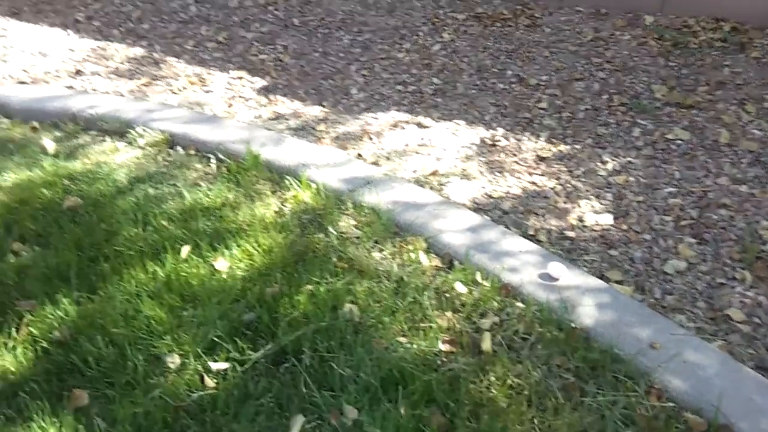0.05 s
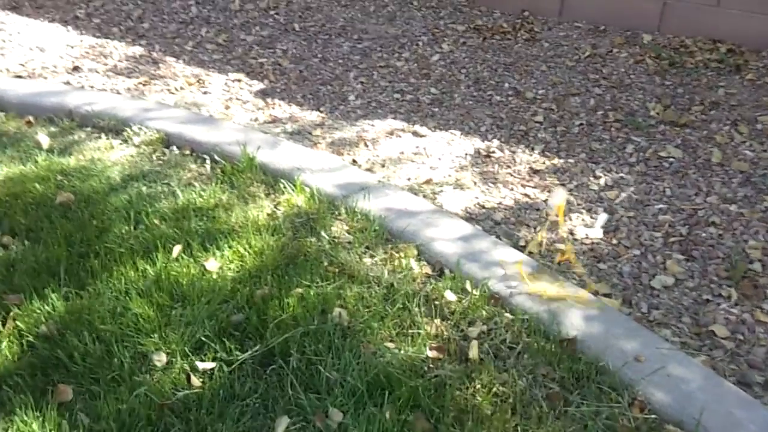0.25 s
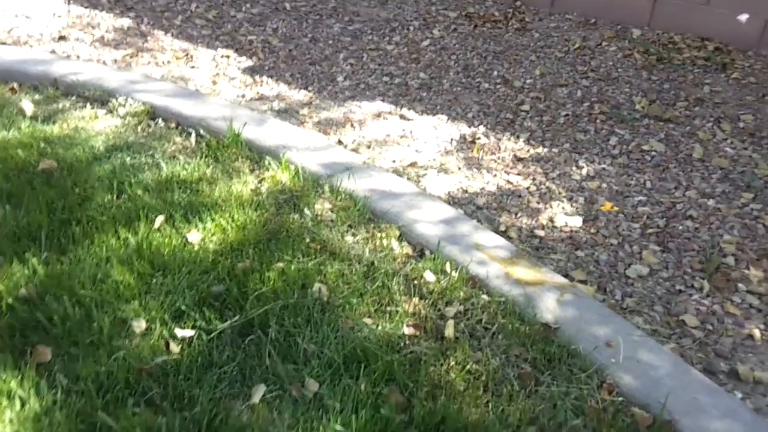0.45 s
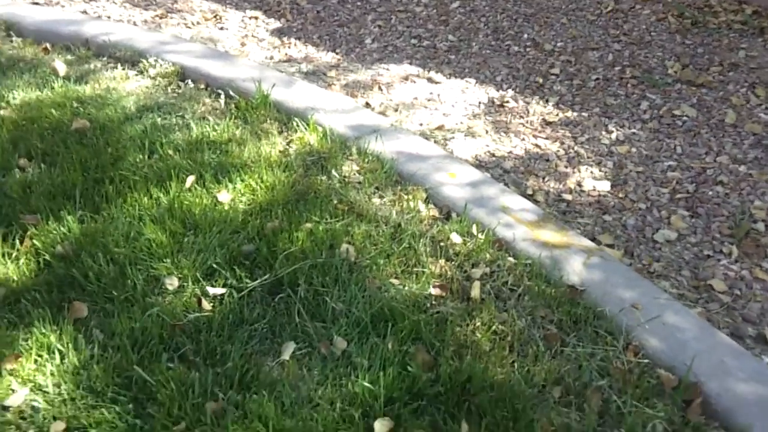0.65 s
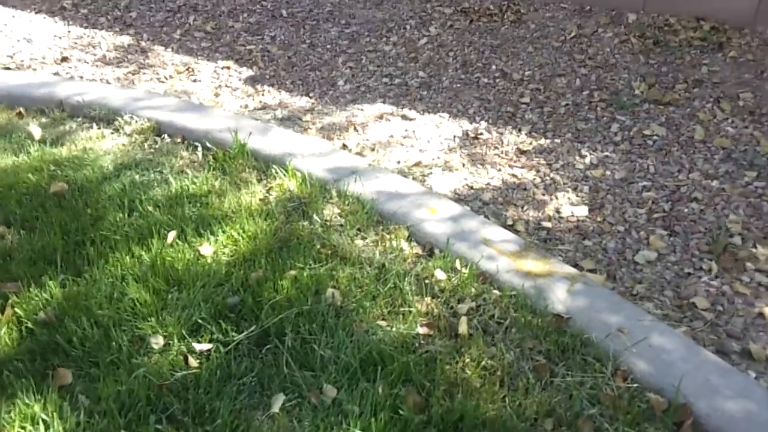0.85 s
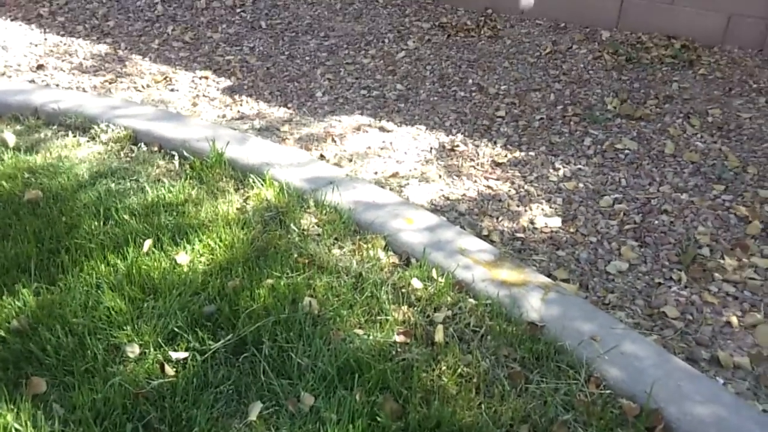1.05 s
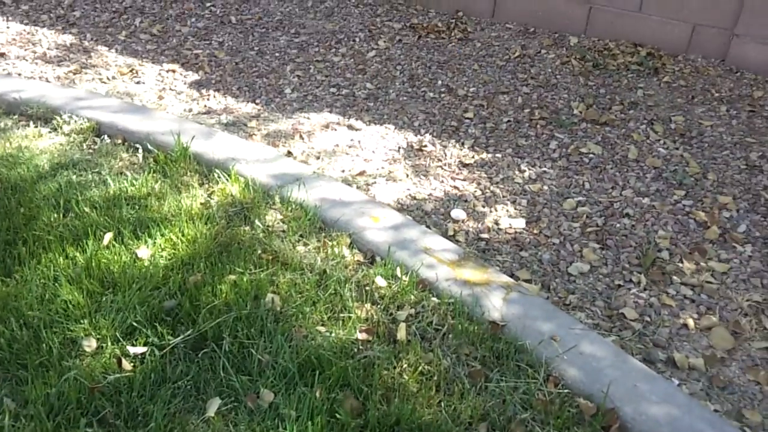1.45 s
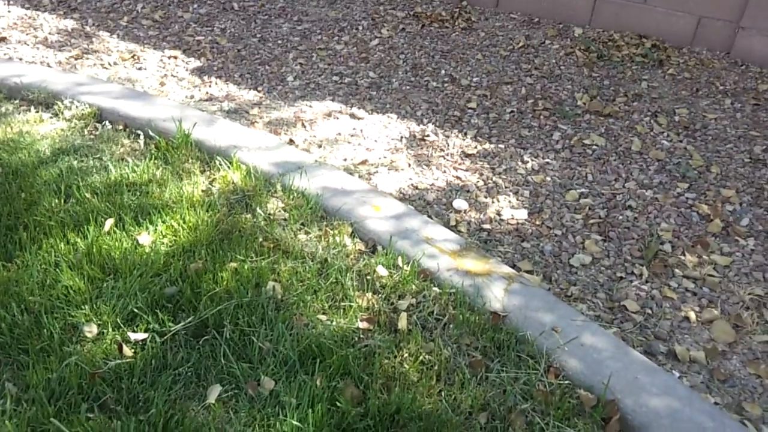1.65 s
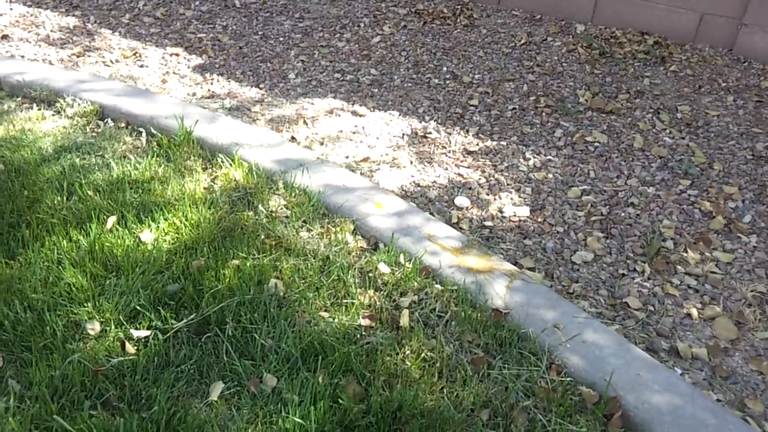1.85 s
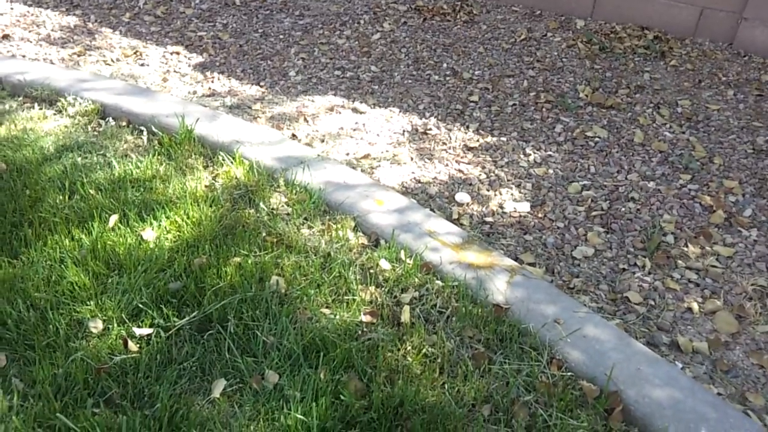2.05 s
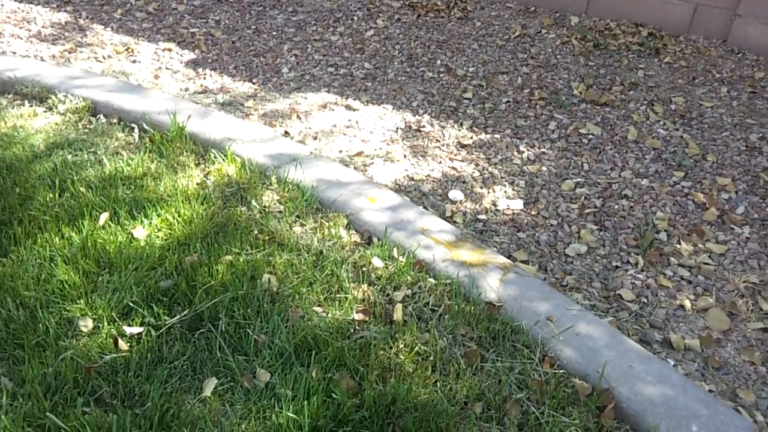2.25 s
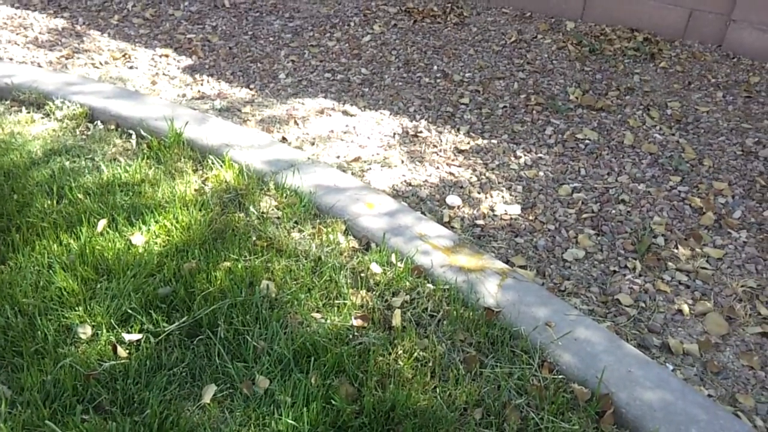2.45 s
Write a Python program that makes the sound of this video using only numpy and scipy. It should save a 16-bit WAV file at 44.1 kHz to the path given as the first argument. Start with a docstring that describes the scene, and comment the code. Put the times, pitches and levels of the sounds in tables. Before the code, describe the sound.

An egg smacks onto a concrete curb with one sharp, wet splat outdoors.

```python
"""A crack and a flat, wet slap: an egg thrown onto a concrete curb, close to the microphone in a quiet yard.
The shell gives way, the body lands with a push of air, and the spray overloads the input. Drops and
shell bits patter into gravel and dry leaves while the walls answer. Later come light ticks, a faint
far drone and soft scuffs, over hiss and a low rumble of air."""
import sys
import numpy as np
from scipy import signal
from scipy.fft import rfft, irfft, next_fast_len
from scipy.io import wavfile
from scipy.ndimage import map_coordinates

SR = 44100
rng = np.random.default_rng(int(sys.argv[2]) if len(sys.argv) > 2 else 0)


def master(y):
    """Save y as 16-bit WAV."""
    cut = np.clip(np.atleast_2d(y).T, -1, 1)
    pcm = np.round(cut * 32767)  # scale
    wavfile.write(sys.argv[1], SR, pcm.astype(np.int16))


N = 110250
T = np.arange(N) / SR
HIT_S = .2398  # the egg's body meets the curb

# At the curb, close up. Modes of the slap: f/Hz, level/dB, t60/s
SLAP_MODES = [(376, -5.5, 0.075), (548, 1, 0.03), (643, -8, 0.11), (1486, -9.5, 0.15)]
# spectra of the cracking shell, the wet smack and the spray: f/Hz, level/dB
SHELL_SPECTRUM = [(200, -13), (1500, -9), (4500, -7), (7200, 7), (9000, -9), (12000, -12)]
SMACK_SPECTRUM = [(60, -9), (120, 1), (190, -20.5), (380, 2.5), (850, -8), (1500, -0.5), (3200, -3),
                  (5500, -1), (8000, -7), (12000, -1.5)]
SPRAY_SPECTRUM = [(100, -35), (500, -4), (900, -1), (1500, -2.5), (1950, -9.5), (2450, 1.5), (3400, -2),
                  (5300, 2), (6800, 3.5), (9300, 4), (12000, -6)]
# large drops and shell bits landing near the curb: t/s, level/dB, f/Hz
LARGE_DROPS = [(0.2458, 2, 3280), (0.2481, -1, 2870), (0.2594, -3.5, 1560), (0.2684, 2.5, 1570),
               (0.2722, -2, 1440), (0.2923, -24, 1600), (0.3017, -6.5, 1890), (0.3029, -10, 4170),
               (0.3412, -14, 4060), (0.3598, -15, 2940), (0.3644, -16, 6000), (0.3699, -14, 2680),
               (0.3798, -12.5, 7600), (0.3937, -17.5, 3750), (0.4213, -21, 1750), (0.4798, -32, 2900)]
# spectra of fine drops on the gravel, near and farther out: f/Hz, level/dB
NEAR_PATTER_SPECTRUM = [(200, -5), (1200, -5), (4000, -1), (8000, -5), (12000, -32)]
FAR_PATTER_SPECTRUM = [(500, -11), (2000, 4.5), (4500, -1), (12000, -24)]
# decay between the yard walls: f/Hz, t60/s
WALL_DECAY = [(100, 0.65), (500, 0.5), (2200, 0.79), (7000, 0.48), (12000, 0.18)]
# colour of the walls' answer: f/Hz, level/dB
WALL_COLOUR = [(125, 2), (550, -16), (1100, -2.5), (1700, -6), (4000, -6.5), (8000, -10.5), (12000, 8.5)]
# light ticks in gravel and leaves: t/s, level/dB, f/Hz, Q
GRAVEL_TICKS = [(0.139, -44.5, 6200, 4), (0.1412, -43.5, 342, 2.7), (0.5638, -40.5, 8150, 0.85),
                (0.7484, -40.5, 7350, 1.9), (0.796, -43, 5180, 1.8), (.829, -44, 1670, 0.74),
                (0.836, -33, 7140, 0.92), (1.063, -41, 5900, 3.1), (1.081, -40.5, 5500, 1.1),
                (1.2121, -33, 3480, 0.083), (1.214, -33.5, 7860, 0.47), (1.428, -44.5, 2500, 0.21),
                (2.2402, -36.5, 6030, 3), (2.3703, -39, 1160, 0.55), (2.379, -35.5, 6850, 2.1),
                (2.3898, -38.5, 1810, 2.6)]
# soft scuffs on the ground: t/s, level/dB, half length/s, tilt/(dB per octave)
GROUND_SCUFFS = [(0.195, -50, 0.019, 0), (0.728, -51, 0.064, 2.5), (1.16, -50, 0.015, 5),
                 (2.267, -45, 0.045, 4), (2.384, -43, 0.029, 2), (2.433, -49, 0.12, 5)]
# spectra of a scuff and of dry leaves: f/Hz, level/dB
SCUFF_SPECTRUM = [(150, -3), (800, 9), (2200, 8), (3500, 0), (6600, -1), (7450, 3.5), (8200, -6),
                  (12000, -10.5)]
LEAF_SPECTRUM = [(200, -30), (3000, -13), (6000, -5), (12000, -4.5)]
# how strongly the leaves stir: t/s, level/dB
LEAF_STIR = [(0, -19), (.7, 3), (1.16, -1), (1.33, -20), (1.58, -1), (1.82, -14)]
# fuzzy tones of the far drone: f/Hz, width/Hz, level/dB
DRONE_TONES = [(629, 25, -60), (866, 73, -57.5), (1160, 54, -57)]
# spectra of the open air: f/Hz, level/dB
HISS_SPECTRUM = [(88, -41), (150, -4), (380, -2), (750, -7), (1450, -8.5), (3000, -12.5), (5500, -12.5),
                 (8000, -16), (11500, -19)]
RUMBLE_SPECTRUM = [(15, -7), (30, 0), (65, 2), (100, -5), (160, -11.5), (400, -43.5)]
# soft bumps at the microphone: t/s, level/dB
MIC_BUMPS = [(0.696, -30.5), (2.168, -41)]


def amp(db):
    """Decibels to gain."""
    return 10 ** (np.asarray(db) / 20)


def unit(x):
    """Scale to rms 1."""
    return x / np.sqrt(np.mean(x ** 2) + 1e-20)


def along(points, hz):
    """Read (f/Hz, value) points on a log axis."""
    f, values = np.transpose(points)
    return np.interp(np.log(hz + 1), np.log(f + 1), values)


def filtered(x, response):
    """Shape x by a frequency response."""
    size = next_fast_len(N + SR // 2)
    return irfft(rfft(x, size) * response(np.fft.rfftfreq(size, 1 / SR)), size)[:N]


def coloured(x, spectrum):
    """Shape x by (f/Hz, level/dB) points."""
    return filtered(x, lambda f: amp(along(spectrum, f)))


def low_pass(x, edge_hz):
    """A steep low-pass with a slightly rounded edge."""
    return filtered(x, lambda f: .5 - .5 * np.tanh((f - edge_hz) / 90))


def noise(spectrum):
    """Smooth coloured noise, rms 1."""
    return unit(coloured(rng.standard_normal(N), spectrum))


def band_noise(hz, q):
    """Noise passed twice through one resonance, rms 1."""
    def resonance(f):
        damping = 1j * f * hz / q
        return damping / (hz ** 2 - f * f + damping)
    return unit(filtered(rng.standard_normal(N), lambda f: resonance(f) ** 2))


def grains(spectrum, per_s):
    """Tiny impacts of random size at random moments, rms 1."""
    impacts = (rng.random(N) < per_s / SR) * rng.standard_normal(N)
    return unit(coloured(impacts, spectrum))


def envelope(start, rise, hold, t60):
    """Linear rise; from hold seconds after the start, an even fall in dB."""
    t = T - start
    return np.clip(t / rise, 0, 1) * amp(-60 * np.maximum(t - hold, 0) / t60)


def swell(centre, width):
    """A bell-shaped rise and fall."""
    return np.exp(-.5 * ((T - centre) / width) ** 2)


def sine(hz, start=0):
    """A sine rising through zero at start."""
    return np.sin(2 * np.pi * hz * (T - start))


def wobble(per_s):
    """A smooth random curve with per_s knots a second."""
    return map_coordinates(rng.standard_normal(4096), [T * per_s], mode="mirror")


def clumps():
    """A fast flutter of gain: fine drops and grit come in clumps."""
    return amp(3.5 * np.tanh(wobble(per_s=240.7)))


def splat():
    """Close to the microphone the shell cracks, the body slaps down and its contents squirt out."""
    crack = envelope(HIT_S - .0081, rise=.0013, hold=.0084, t60=.015) * grains(SHELL_SPECTRUM, per_s=9300)
    slap = sum(-amp(db) * envelope(HIT_S, rise=.00016, hold=0, t60=t60) * sine(hz, HIT_S)
               for hz, db, t60 in SLAP_MODES)
    smack = envelope(HIT_S, rise=.00047, hold=.007, t60=.077) * noise(SMACK_SPECTRUM)
    spray = envelope(HIT_S, rise=.015, hold=.035, t60=.1) * grains(SPRAY_SPECTRUM, per_s=6000)
    return amp(-21) * crack + slap + amp(4) * smack + amp(-2.5) * spray


def air_push():
    """Air squeezed from under the egg: one pressure pulse, then the microphone input's slow undershoot."""
    arrival_s, undershoot_s = HIT_S + .0072, .025
    age = np.maximum(T - arrival_s, 0) / undershoot_s
    return amp(2.5) * swell(arrival_s, width=.0026) - amp(-19) * age * np.exp(1 - age)


def spatter():
    """Fine drops rain on the gravel, the farthest landing last; each large one snaps and fizzes."""
    near = amp(-29) * envelope(HIT_S + .053, rise=.023, hold=.098, t60=.14)
    near *= grains(NEAR_PATTER_SPECTRUM, per_s=2200)
    far = amp(-42.5) * envelope(HIT_S + .16, rise=.086, hold=.086, t60=.75)
    far *= grains(FAR_PATTER_SPECTRUM, per_s=900)
    out = (near + far) * clumps()
    for start, db, hz in LARGE_DROPS:
        snap = envelope(start, rise=.00014, hold=0, t60=9 / hz) * sine(hz, start)
        fizz = envelope(start, rise=.000067, hold=.0011, t60=.01) * band_noise(hz, q=.56)
        out += amp(db) * (snap + amp(-8.5) * fizz)
    return out


def yard_walls(source):
    """The walls around the yard answer; the middle of the spectrum lingers longest."""
    build_up_s = .028
    hz, t, bins = signal.stft(rng.standard_normal(SR), SR, nperseg=256)
    decay = amp(-60 * t / along(WALL_DECAY, hz)[:, None])
    _, tail = signal.istft(bins * decay, SR, nperseg=256)
    tail *= np.clip(np.arange(len(tail)) / SR / build_up_s, 0, 1)
    reflections = signal.fftconvolve(source, tail / np.linalg.norm(tail))[:N]
    return amp(-15.5) * coloured(reflections, WALL_COLOUR)


def ticks():
    """Small bits touch stones and leaves, each with a tick and a brief rustle; one rings a pebble."""
    pebble = envelope(1.2135, rise=.00032, hold=.001, t60=.1) * band_noise(3650, q=17)
    out = amp(-42.5) * pebble
    for start, db, hz, q in GRAVEL_TICKS:
        tick = envelope(start, rise=.00073, hold=.0016, t60=.016)
        rustle = amp(-10.5) * envelope(start, rise=.013, hold=.016, t60=.096)
        out += amp(db) * (tick + rustle) * band_noise(hz, q)
    return out


def scuffs():
    """Soft gritty rubbing at ground level: dry leaves, and perhaps a shoe shifting on the grass."""
    rubs = np.zeros(N)
    for centre, db, width, tilt in GROUND_SCUFFS:
        spectrum = [(hz, level + tilt * np.log2(hz)) for hz, level in SCUFF_SPECTRUM]
        rubs += amp(db) * swell(centre, width) * grains(spectrum, per_s=9000)
    return rubs * clumps()


def leaves():
    """Dry leaves stir faintly in the air moving through the yard."""
    stir_db = np.interp(T, *np.transpose(LEAF_STIR))
    flutter_db = 7.5 * wobble(per_s=22.03)
    return amp(-60.5 + stir_db + flutter_db) * grains(LEAF_SPECTRUM, per_s=6100)


def drone():
    """Far off, a thin wavering note among a few fuzzy tones swells and fades."""
    tones = sum(amp(db) * band_noise(hz, q=hz / width / 2) for hz, width, db in DRONE_TONES)
    note_hz = 1090 + 3.5 * wobble(per_s=17)
    note = amp(-54.5) * np.sin(2 * np.pi * np.cumsum(note_hz) / SR)
    return envelope(1.79, rise=.044, hold=.057, t60=1.84) * (tones + note)


def background():
    """The quiet yard: hiss, rumbling air with one gust, a faint hum and low bumps at the microphone."""
    gust_db = 7.5 * swell(.68, width=.097)
    rumble = amp(-51.5 + gust_db) * noise(RUMBLE_SPECTRUM)
    hiss = amp(-51) * noise(HISS_SPECTRUM)
    hum = amp(-57.5) * sine(hz=122)
    bumps = sum(-amp(db) * swell(t, width=.0099) * sine(hz=55, start=t) for t, db in MIC_BUMPS)
    return hiss + rumble + hum + bumps


def scene():
    """Everything that reaches the one microphone by the curb."""
    egg = splat() + spatter()
    return (egg + air_push() + yard_walls(egg) + ticks() + scuffs() + leaves() + background() + drone())[None]


def record(dry):
    """The microphone input overloads and is band-limited; the output stage clips the remaining peaks."""
    input_limit, output_limit = .75, .77
    mic = low_pass(np.clip(dry[0], -input_limit, input_limit), edge_hz=11750)
    return low_pass(np.clip(mic, -output_limit, output_limit), edge_hz=15850)[None]


dry = scene()
out = record(dry)
master(out)
```